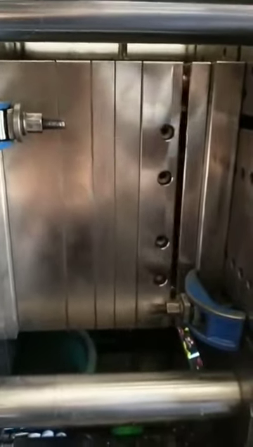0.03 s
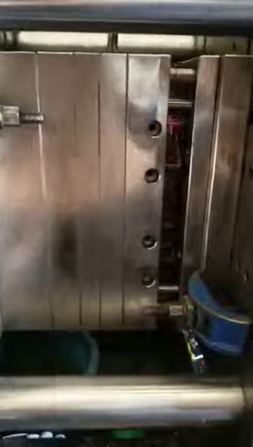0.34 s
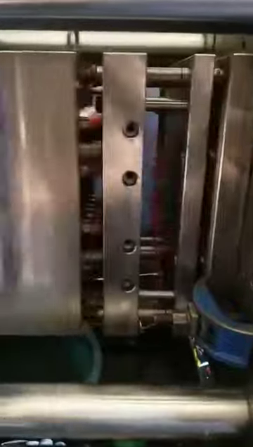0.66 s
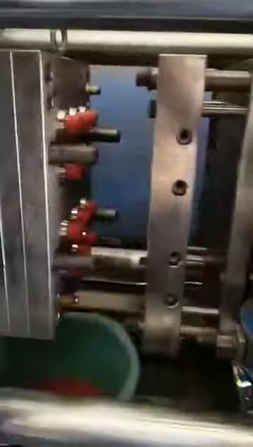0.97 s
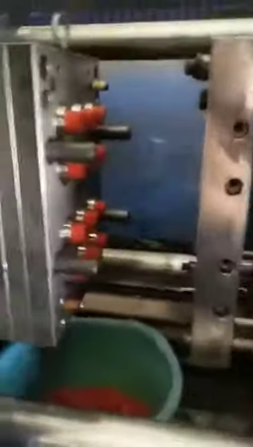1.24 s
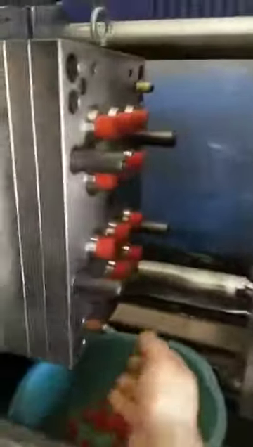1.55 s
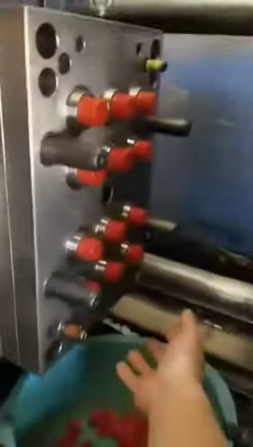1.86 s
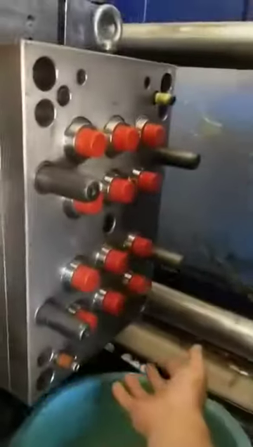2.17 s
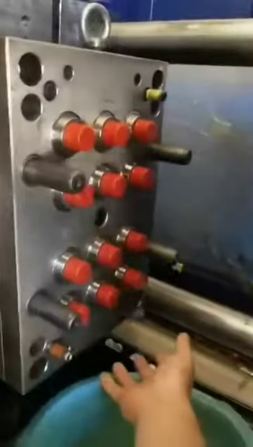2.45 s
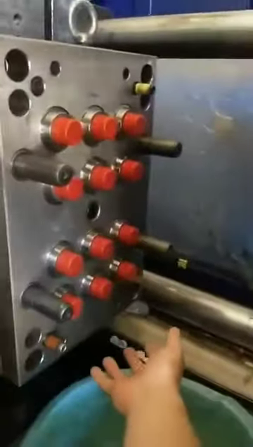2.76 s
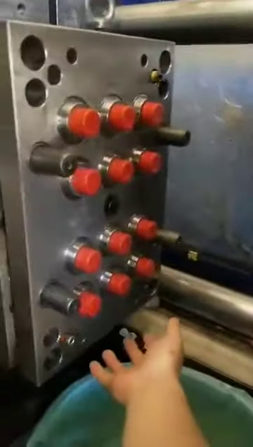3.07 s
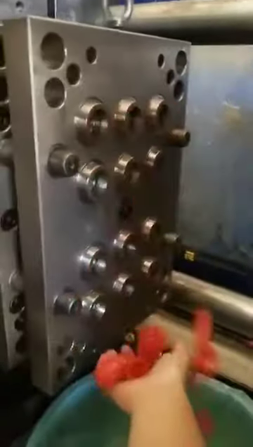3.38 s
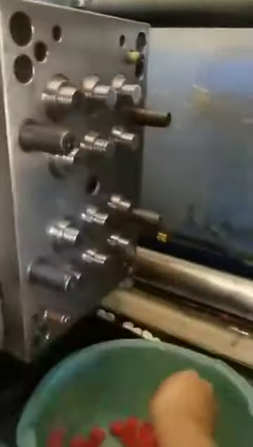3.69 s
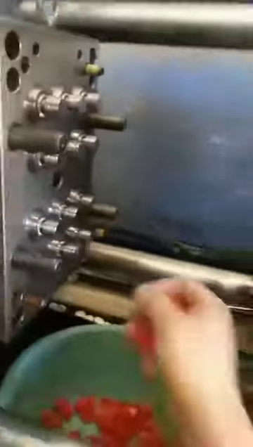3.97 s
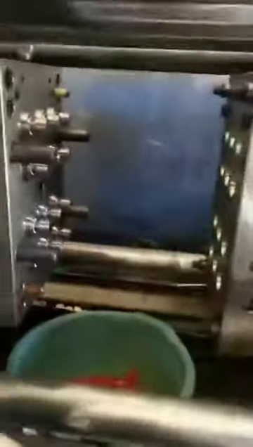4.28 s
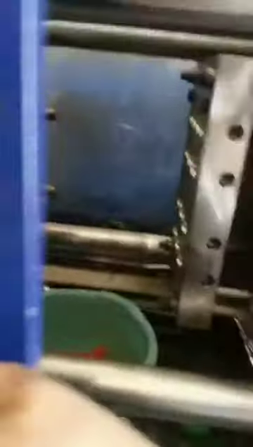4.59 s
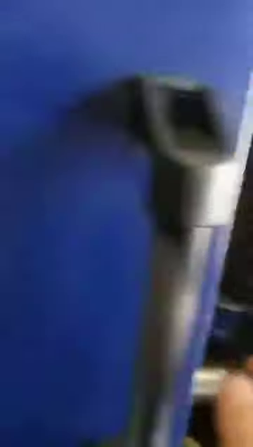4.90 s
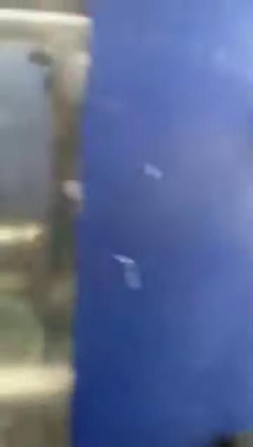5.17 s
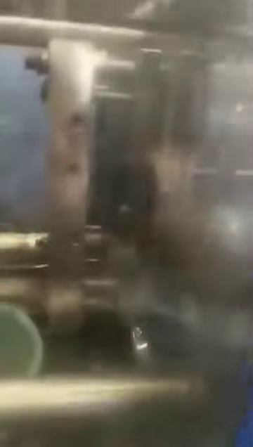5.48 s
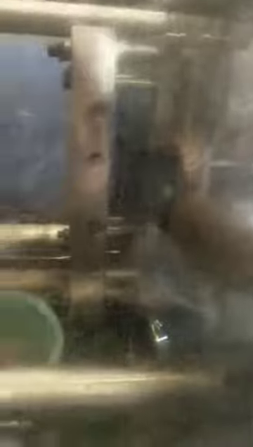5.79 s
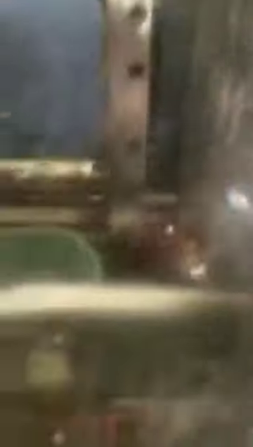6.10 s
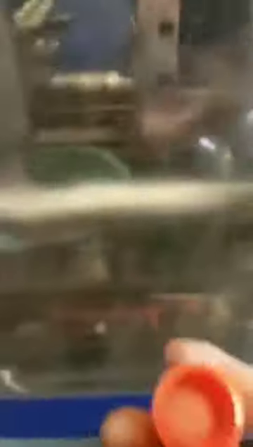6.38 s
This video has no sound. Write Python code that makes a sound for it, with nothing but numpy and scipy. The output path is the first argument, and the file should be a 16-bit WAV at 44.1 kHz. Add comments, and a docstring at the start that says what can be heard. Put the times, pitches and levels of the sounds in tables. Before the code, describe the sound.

Steady hiss and a high motor whine surround a steel mould's clunks, ejector knocks and plastic caps clattering into a tub in a factory.

```python
"""An injection moulding machine, close up: its steel mould unlatches and breaks open with a clunk.
The ejector knocks out and back, and plastic caps drop into a tub. A leak hisses and sings between
the plates, the motor drive whines and an oil valve hums. As the microphone backs out from the plates,
the hiss falls away and the factory hall comes up. Last, the guard door rolls shut, screening the
leak's singing overtones."""
import sys
import numpy as np
from scipy import signal
from scipy.fft import rfft, irfft
from scipy.io import wavfile

SR = 44100
rng = np.random.default_rng(int(sys.argv[2]) if len(sys.argv) > 2 else 0)


def master_out(mix):
    """Clip the mix to full scale and print it as 16-bit PCM to the path in sys.argv[1]."""
    frames = np.transpose(np.atleast_2d(mix))
    ceiling = np.clip(frames, -1, 1)
    pcm = np.round(ceiling * 32767).astype(np.int16)
    wavfile.write(sys.argv[1], SR, pcm)


N = 284004
TIME = np.arange(N) / SR
BACKING_S, SHUTTING_S = (3.57, 4.63), (5.8, 6.2)  # the microphone backs out; the guard closes

# Noise spectra, as heard at the mould. Each row: frequency in Hz, relative level in dB.
HALL_SPECTRUM = [(25, -37), (45, -11), (75, 0.5), (190, -4), (340, -2), (550, -7.5), (780, -7.5),
                 (1050, -13), (1700, -12.5), (2600, -10), (6500, -18.5), (12000, -59)]
JET_SPECTRUM = [(1650, -17), (2300, -8), (2850, -13.5), (3080, -5.5), (3490, -6), (3890, 5), (4600, 7),
                (5230, -0.5), (5600, -3), (6500, -6), (7070, -5.5), (7550, -12), (8900, -14), (9640, -29),
                (10500, -14.5), (11800, -17), (15600, -55)]
PANEL_SPECTRUM = [(30, -15), (70, 1), (115, 7), (170, 2.5), (245, 1.5), (330, -9), (600, -25), (1500, -25),
                  (6000, -69)]
ROLLER_SPECTRUM = [(40, -25), (120, -10), (240, 4), (400, -21), (900, -15), (2000, -36), (6000, -60)]
CLATTER_SPECTRUM = [(40, -39), (300, -9), (550, -10), (1120, 2.5), (1600, -16), (2100, -14), (3000, -11),
                    (5000, -21), (11000, -25)]
TUB_HOLLOW_SPECTRUM = [(60, -42), (225, 1), (330, -3), (520, -13.5), (1150, -9), (5000, -43)]
BACK_STOP_SPECTRUM = [(60, -38), (260, 1.5), (820, 0.5), (1000, -12), (1170, -15), (1370, -35),
                      (2000, -3.5), (2300, -9), (6000, -32)]
FRAME_SPECTRUM = [(30, -48), (70, -16.5), (130, -9), (230, -2), (400, 1.5), (600, -9), (800, -3.5),
                  (1100, -5.5), (1600, -9.5), (2300, -10), (3500, -17), (6500, -14), (12000, -40.5)]
CRACK_SPECTRUM = [(40, -43), (1200, -6), (2600, 9), (4000, 2), (5800, 10.5), (8000, 0.5), (12000, -6)]

# Modes of the struck parts. Each row: frequency in Hz, relative level in dB, base t60 in seconds.
TUB_RING = [(202, -6, 0.17), (235.5, -2, 0.16), (296, -7.5, 0.18), (373.5, -12.5, 0.17)]
CAP_RING = [(686, -16, 0.064), (1136, -3, 0.082), (1390, -10.5, 0.062), (1778, -8.5, 0.066),
            (2237, -13.5, 0.1)]
EJECTOR_RING = [(358, -1, .4), (444, 2, .26), (590, -5, .18), (775, 1, .17), (950, -7, .14), (1280, 1, .13),
                (1620, -4, .14), (2440, -6, .14)]
LATCH_RING = [(1520, -1, .11), (1590, -1.5, .14), (1690, -8, .12), (1938, -3, .18), (2190, -10, .15)]
MOULD_RING = [(229, -8, .8), (362, -10, .6), (395, -7, .4), (459, -7, .4), (514, -7, .38), (696, 6, .27),
              (785, 5.5, .21), (876, -6, .42), (1470, -10, .3), (1560, -7, .3), (1645, -15, .7),
              (2299, -6, .35)]

# Side tones of the drive. Each row: frequency in Hz, unscreened level in dB.
DRIVE_SIDE_TONES = [(2375, -58), (2601, -58)]
# Swelling sounds. Each row: centre in seconds, half length in seconds, relative level in dB.
DRIVE_SWELLS = [(.3, 0.049, -45), (1.08, 0.028, -37), (2.51, 0.38, -40), (3.215, 0.22, -38.5),
                (3.81, 0.016, -42), (4.67, 0.046, -44), (5.97, 0.067, -38), (6.46, 0.11, -36.5)]
VALVE_HUMS = [(0.168, 0.052, -46), (0.311, 0.023, -49)]
CAP_SCRAPES = [(2.96, 0.016, -35.5), (3.385, 0.017, -38)]

# Gaps between the plates. Each row: resonance in Hz, width in Hz, close-up level in dB.
PLATE_GAPS = [(4052, 110, -48), (4576, 140, -47), (5620, 60, -52)]
# The hiss's treble at the microphone. Each row: time in seconds, level in dB.
JET_TREBLE = [(0.0, -43.5), (1.67, -44), (1.96, -49), (2.36, -48), (2.82, -42.5), (3.68, -46.5),
              (4.16, -51), (5.0, -54), (6.44, -55.5)]
# The pitch whose overtones the leak sings. Each row: time in seconds, pitch in Hz.
JET_PITCH = [(0, 785), (3.4, 800), (3.75, 815), (4.1, 812), (4.36, 797), (4.75, 812), (5.1, 830),
             (5.36, 819), (5.72, 824), (6.44, 831)]
# Those overtones. Each row: multiple, relative level in dB, change behind the shut guard in dB.
JET_OVERTONES = [(4, 0.5, -4), (5, -3, -8), (6, 0.5, -21)]
# The leak's whistles. Each row: centre in seconds, half length in seconds, multiple, level in dB.
JET_WHISTLES = [(1.18, .07, 6, -43), (3.87, .13, 6, -45.5), (4.02, .06, 5, -46.5), (4.1, .025, 4, -44.5),
                (4.35, .075, 6, -41.5), (4.43, .06, 5, -46.5), (4.69, .05, 4, -48.5), (4.74, .08, 6, -44.5),
                (5.08, .02, 4, -49), (5.42, .06, 6, -49), (5.69, .05, 6, -46.5), (5.76, .04, 4, -48)]

# Dull bumps of the carriage, tub and guard door. Each row: start in seconds, level in dB.
PANEL_BUMPS = [(.849, -46), (1.609, -48), (3.572, -37.5), (3.643, -39), (3.835, -41.5), (4.402, -39),
               (5.446, -39), (5.485, -34.5), (5.557, -44), (5.594, -43), (6.015, -41.5), (6.162, -42.5)]
# Steel sliding. Each row: centre and half length in seconds, pitch and width in Hz, level in dB.
STEEL_SQUEAKS = [(1.352, 0.024, 5660, 38, -45), (2.858, 0.028, 5880, 130, -38.5),
                 (2.89, 0.011, 5620, 80, -33), (5.672, 0.02, 899, 16, -48),
                 (6.232, 0.064, 237.8, 21, -44.5)]
# The loudest caps snapping off their cores and landing on a hand and the tub.
# Each row: start in seconds, level in dB, relative clatter in dB.
CAP_HITS = [(2.963, -44.5, 15), (3.043, -52.5, 20), (3.370, -26.5, -9), (3.387, -30, -11),
            (3.415, -25, -3.5), (3.434, -20, -4.5), (3.453, -27.5, -1.5), (3.490, -28, -4.5),
            (3.521, -27, -3.5), (3.676, -23, -33), (3.789, -39, 2)]
# Knocks of the sliding plates and the ejector. Each row: start in seconds, level in dB,
# then crack, frame, plate and back stop in relative dB, t60 in seconds.
EJECTOR_KNOCKS = [(1.095, -42, -34, -10, -4.5, -29, 0.39), (2.469, -35, -23, -17, -6, -10, 0.14),
                  (2.787, -39, 3, -4.5, -9.5, -5.5, 0.27), (2.887, -23.5, -1, -5, -7, -16, 0.35),
                  (2.964, -28, -33, -18, -2.5, -29, 0.092), (3.687, -27.5, -4, -6.5, -24, 0.5, 0.38)]
# The mould unlatching and breaking open. Each row: start in seconds, level in dB,
# then crack, plates and latch in relative dB, t60 in seconds.
MOULD_BLOWS = [(0.402, -23, -3.5, -6, 0.5, 0.28), (0.4202, -29, -10, 0, 3, 0.061),
               (.461, -20, 3.5, -5.5, -11, 0.43)]


def undb(db):
    """Decibels to gain."""
    return 10 ** (np.asarray(db) / 20)


def noise(spectrum):
    """Noise of rms 1, shaped by a spectrum table."""
    hz, db = np.transpose(spectrum)
    bins_hz = np.maximum(np.fft.rfftfreq(N, 1 / SR), 1)
    gain = undb(np.interp(np.log(bins_hz), np.log(hz), db))
    shaped = irfft(rfft(rng.standard_normal(N)) * gain, N)
    return shaped / shaped.std()


def walk(rate_hz):
    """Smooth random motion of spread 1, up to about rate_hz changes a second."""
    size = 8192
    hz = np.fft.rfftfreq(size, N / SR / size)
    motion = irfft(rfft(rng.standard_normal(size)) / (1 + (hz / rate_hz) ** 2) * (hz > 0))
    return np.interp(TIME, np.linspace(0, N / SR, size), motion / motion.std())


def phase_of(hz):
    """Phase of a moving pitch."""
    return 2 * np.pi * np.cumsum(hz) / SR


def airy(phase, width_hz):
    """A tone smeared into a narrow band of noise."""
    return walk(width_hz) * np.sin(phase) + walk(width_hz) * np.cos(phase)


def ramp(span_s):
    """0 before a span of time, 1 after it, straight between."""
    return np.interp(TIME, span_s, [0, 1])


def bell(centre_s, half_s):
    """Gain that swells to 1 and fades again."""
    return np.exp(-.5 * ((TIME - centre_s) / half_s) ** 2)


def fade(t60, rise_s=0.0011):
    """One second of decay after a quick rise, falling 60 dB in t60 seconds."""
    t = TIME[:SR]
    return np.exp(-np.log(1000) * t / t60) * (1 - np.exp(-t / rise_s))


def ring(modes, scatter, t60_scale=1):
    """Struck modes, detuned by scatter; each blow lands elsewhere and weights them differently."""
    out = np.zeros(SR)
    for hz, db, t60 in modes:
        weight, detune, phase = rng.standard_normal(3)
        tone = np.sin(2 * np.pi * hz * (1 + scatter * detune) * TIME[:SR] + np.pi * phase)
        out += undb(db + 2.9 * weight) * fade(t60 * t60_scale) * tone
    return out


def piece(long_noise):
    """One second from anywhere in a long noise."""
    start = rng.integers(N - SR)
    return long_noise[start:start + SR]


def add(track, start_s, sound):
    """Mix a sound into a track."""
    start = int(start_s * SR)
    track[start:start + len(sound)] += sound[:N - start]


def scattered(from_s, to_s, db, spread_db, count):
    """Start and level of unevenly strewn events, one in each equal slot of time."""
    place, strength = rng.random((2, count))
    starts = from_s + (to_s - from_s) * (np.arange(count) + place) / count
    return list(zip(starts, db + spread_db * (2 * strength - 1)))


def hall():
    """Machines far off: a wash with throbbing bass, louder once the plates stop shielding it."""
    level_db = -52.5 + 6.5 * np.sqrt(ramp(BACKING_S))
    wash = noise(HALL_SPECTRUM)
    bass = signal.sosfiltfilt(signal.butter(2, 450, fs=SR, output="sos"), wash)
    return (wash - bass + bass * undb(2 * walk(27))) * undb(level_db)


def motor_drive(whine_hz=2647.6, edge_s=0.021):
    """A pure switching whine, faint and fluttering in its standing-wave nulls, swelling between them."""
    shield = undb(-5.5 * (1 - ramp(BACKING_S)))  # screened while the microphone is between the plates
    nulls = shield * undb(-55 + 5 * walk(5.3))
    swells = sum(undb(db) * .5 * (1 + np.tanh((half - abs(TIME - s)) / (2 * edge_s)))
                 for s, half, db in DRIVE_SWELLS)
    shimmer = undb(0.9 * walk(30))
    whine = (nulls + swells * shimmer) * undb(2.5) * np.sin(2 * np.pi * whine_hz * TIME)
    sides = sum(undb(db + 4.7 * walk(4.3)) * np.sin(2 * np.pi * hz * TIME + 0.95 * walk(24))
                for hz, db in DRIVE_SIDE_TONES)
    return whine + shield * sides


def oil_valve(sag_hz_per_s=210):
    """Oil through a valve hums twice before the mould opens, sagging in pitch."""
    hz = 755 - sag_hz_per_s * np.minimum(TIME, 1)
    tone = np.sin(phase_of(hz * (1 + 0.024 * walk(47))))
    hums = sum(undb(db) * bell(s, half) for s, half, db in VALVE_HUMS)
    return tone * hums * undb(2 * walk(30))


def reflections(direct, drift_s=.0001):
    """Short echoes off nearby steel; the hand-held microphone drifts, so their comb shifts."""
    lags_s = rng.uniform(0.000994, .008, 6)
    echoes = sum(np.interp(TIME - lag - drift_s * walk(0.9), TIME, direct) for lag in lags_s)
    combed = direct + 0.26 * echoes
    return combed * direct.std() / combed.std()


def leak_hiss():
    """A fluttering jet rings the gaps between the plates, fainter as the microphone backs away."""
    away_db = -16 * ramp(BACKING_S)
    jet = reflections(noise(JET_SPECTRUM))
    body = signal.sosfiltfilt(signal.butter(6, 5300, fs=SR, output="sos"), jet)
    treble = jet - body
    body_db = -40.5 + away_db + 0.6 * walk(51)
    treble_db = np.interp(TIME, *np.transpose(JET_TREBLE)) + 1.85 * walk(11)
    out = body / body.std() * undb(body_db) + treble / treble.std() * undb(treble_db)
    for hz, width_hz, db in PLATE_GAPS:
        drifting_hz = hz * (1 + .012 * walk(2))
        out += undb(db + away_db + 3 * walk(12)) * airy(phase_of(drifting_hz), width_hz)
    return out


def leak_singing():
    """The jet half locks on a wavering pitch: airy overtones come and go, or swell into whistles."""
    waver = 1 + .002 * walk(3.07) + .005 * walk(13.6)
    phase = phase_of(np.interp(TIME, *np.transpose(JET_PITCH)) * waver)
    out = np.zeros(N)
    for multiple, db, shut_db in JET_OVERTONES:
        patches = undb(-54.5 + db + shut_db * ramp(SHUTTING_S) + 3 * walk(6))
        whistles = sum(undb(peak_db) * bell(s, half)
                       for s, half, overtone, peak_db in JET_WHISTLES if overtone == multiple)
        out += (patches + whistles) * airy(multiple * phase, width_hz=58)
    return out


def guard_door():
    """Sheet panels rumble at each bump and faint machine thud; the catch ticks and the rollers run."""
    out, panel = np.zeros(N), noise(PANEL_SPECTRUM)
    thuds = scattered(0, N / SR, db=-58.5, spread_db=4.5, count=28)
    for s, db in PANEL_BUMPS + thuds:
        add(out, s, undb(db) * piece(panel) * fade(0.4, rise_s=0.0022))
    catch = undb(-39.5) * piece(noise(CRACK_SPECTRUM)) * fade(.2)
    add(out, 5.338, catch)
    rollers = undb(-46.5) * bell(5.67, half_s=0.13) * noise(ROLLER_SPECTRUM)
    return out + rollers


def squeaks():
    """Steel slides at the tie bars, ejector pins and door: brief rough squeaks and a low groan."""
    return sum(undb(db) * bell(s, half) * airy(2 * np.pi * hz * TIME, width_hz)
               for s, half, hz, width_hz, db in STEEL_SQUEAKS)


def caps():
    """Hollow caps scrape off their cores, brush together as they fall and make the plastic tub boom."""
    clatter, hollow = noise(CLATTER_SPECTRUM), noise(TUB_HOLLOW_SPECTRUM)
    out = noise(CRACK_SPECTRUM) * sum(undb(db) * bell(s, half) for s, half, db in CAP_SCRAPES)
    brushes = scattered(3.345, 3.57, db=-45.5, spread_db=0, count=22)
    for s, db in brushes:
        add(out, s, undb(db) * (piece(clatter) * fade(0.09) + ring(CAP_RING, scatter=.04)))
    bounces = [(s, db, -10) for s, db in scattered(3.53, 3.84, db=-35, spread_db=5, count=7)]
    for s, db, clatter_db in CAP_HITS + bounces:
        boom = ring(TUB_RING, scatter=0.026) * np.minimum(TIME[:SR] / .005, 1)
        shell = ring(CAP_RING, scatter=0.03)
        rattle = undb(-7) * piece(clatter) * fade(0.14, rise_s=.002)
        cavity = undb(-7.5) * piece(hollow) * fade(0.19, rise_s=0.0085)
        add(out, s, undb(db) * (boom + cavity + undb(clatter_db) * (shell + rattle)))
    return out


def ejector(soft_crack_db=-14, soft_above_hz=323):
    """The lighter ejector plate clacks on its stops and rings; the back stop thuds, the frame rings."""
    out = np.zeros(N)
    frame, crack, thud = noise(FRAME_SPECTRUM), noise(CRACK_SPECTRUM), noise(BACK_STOP_SPECTRUM)
    for s, db, crack_db, frame_db, plate_db, stop_db, t60 in EJECTOR_KNOCKS:
        db_per_octave = 0.42 * min(crack_db - soft_crack_db, 0)  # soft knocks lose the higher modes
        modes = [(hz, mode_db + db_per_octave * max(np.log2(hz / soft_above_hz), 0), mode_t60)
                 for hz, mode_db, mode_t60 in EJECTOR_RING]
        plate = undb(plate_db) * ring(modes, scatter=0.005, t60_scale=t60 / 0.34)
        stop = undb(stop_db) * piece(thud) * fade(t60)
        frame_ring = undb(frame_db) * piece(frame) * fade(t60)
        contact = undb(crack_db) * piece(crack) * (fade(0.068) + undb(-13) * fade(0.78))
        add(out, s, undb(db) * (plate + stop + frame_ring + contact))
    return out


def mould():
    """Steel cracks on steel, ringing plates, latch and frame; the halves judder as they drag apart."""
    out, frame, crack = np.zeros(N), noise(FRAME_SPECTRUM), noise(CRACK_SPECTRUM)
    for s, db, crack_db, plate_db, latch_db, t60 in MOULD_BLOWS:
        plates = undb(plate_db) * ring(MOULD_RING, scatter=0, t60_scale=t60 / 0.51)
        latch = undb(latch_db) * ring(LATCH_RING, scatter=0, t60_scale=0.74)
        frame_ring = undb(-2) * piece(frame) * fade(t60)
        contact = undb(crack_db) * piece(crack) * (fade(0.068) + undb(-23) * fade(0.96))
        hall_tail = undb(-9) * piece(frame) * fade(0.58)
        add(out, s, undb(db) * (plates + latch + frame_ring + contact + hall_tail))
    judders = scattered(0.54, .595, db=-33.5, spread_db=2, count=7)
    for s, db in judders:
        latch = undb(-18) * ring(LATCH_RING, scatter=0.041, t60_scale=0.65)
        add(out, s, undb(db) * (piece(frame) * fade(0.13) + latch))
    return out


def scene():
    """One microphone at the mould, the same in both channels."""
    background = hall() + motor_drive() + oil_valve() + leak_hiss() + leak_singing()
    mono = background + guard_door() + squeaks() + caps() + ejector() + mould()
    return np.array([mono, mono])


def record(dry):
    """The phone's microphone drops the deep bass and cuts the top."""
    thin = signal.sosfilt(signal.butter(3, 48, "high", fs=SR, output="sos"), dry)
    return signal.sosfilt(signal.ellip(10, .2, 80, 12050, fs=SR, output="sos"), thin)


dry = scene()
out = record(dry)
master_out(out)
```